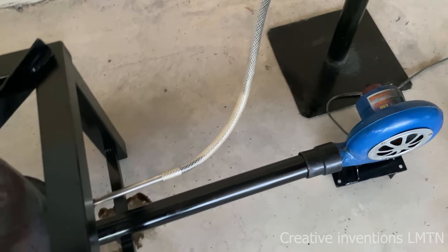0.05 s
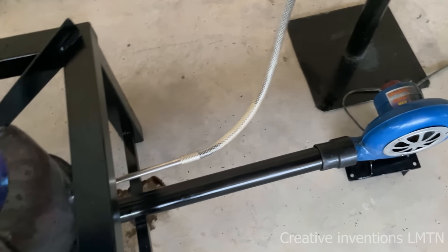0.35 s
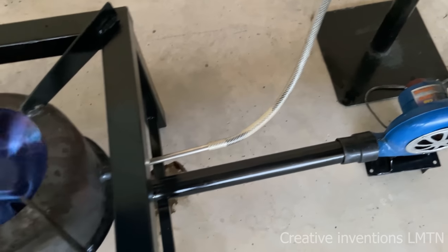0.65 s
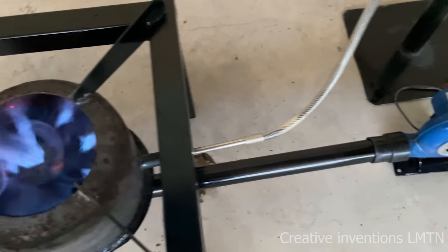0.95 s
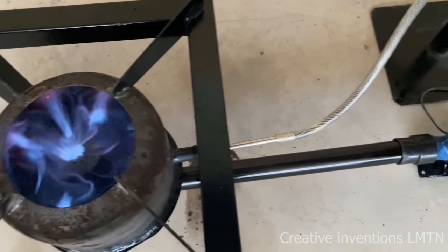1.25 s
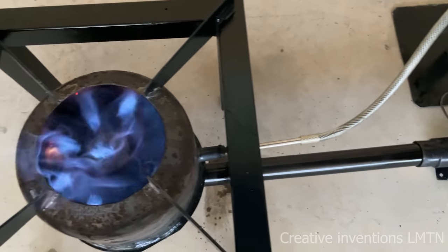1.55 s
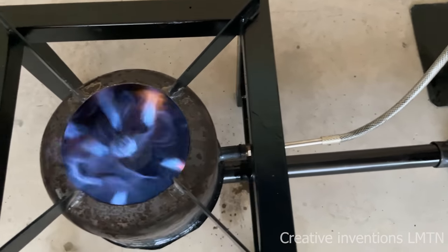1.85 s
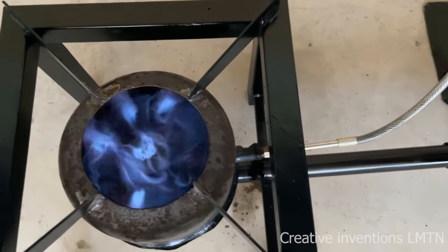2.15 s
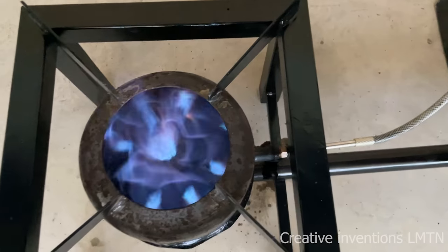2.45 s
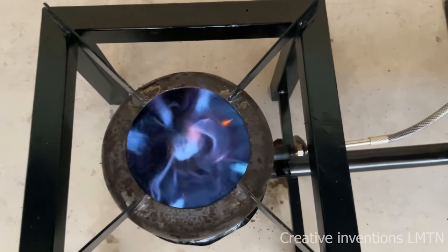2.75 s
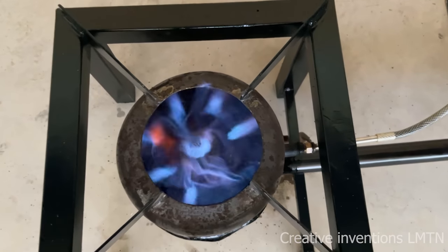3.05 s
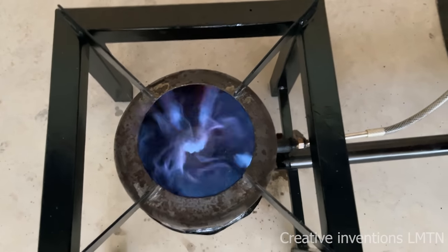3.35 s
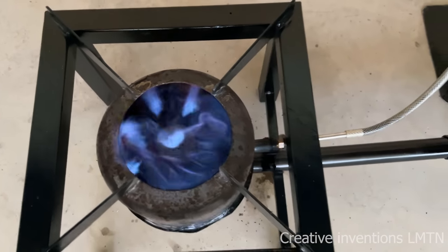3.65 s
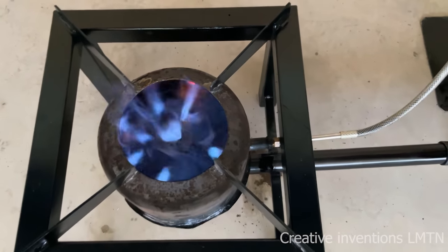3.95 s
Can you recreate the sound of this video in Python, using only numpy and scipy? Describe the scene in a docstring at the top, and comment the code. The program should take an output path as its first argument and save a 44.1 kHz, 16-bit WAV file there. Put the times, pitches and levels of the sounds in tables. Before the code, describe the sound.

A burner flame roars steadily over rushing air and a faint wavering whistle.

```python
"""A blower-fed oil burner runs in a bare workshop, heard from just above its fire pot.
From the start, the swirling flame roars and rumbles, air rushes from the pipe with a wavering whistle,
the fuel sizzles and the blower motor hums faintly. Over the first two seconds the roar grows and the
rush eases as the microphone drifts from the blower to the flame. Then both move from the left toward
the middle. Near the end the whistle swells again and the fuel gives two short spurts."""
import sys
import numpy as np
from scipy import signal
from scipy.fft import rfft, irfft
from scipy.io import wavfile
from scipy.ndimage import uniform_filter1d

SR = 44100
rng = np.random.default_rng(int(sys.argv[2]) if len(sys.argv) > 2 else 0)


def master_out(mix):
    """Clip the mix to full scale and print it as 16-bit PCM to the path in sys.argv[1]."""
    frames = np.transpose(np.atleast_2d(mix))
    ceiling = np.clip(frames, -1, 1)
    pcm = np.round(ceiling * 32767).astype(np.int16)
    wavfile.write(sys.argv[1], SR, pcm)


N = 176400
FLAME_LEAD_MS, AIR_LEAD_MS = 0.23, 0.048  # how much sooner these sounds arrive on the left


# how strongly the flame burns (t/s, level/dB)
FLAME_STRENGTH = [(0.0, -21.5), (0.05, -29), (0.2, -23.5), (0.43, -19.5), (0.5, -26.5), (0.58, -19),
                  (0.82, -24), (0.9, -19.5), (1.12, -21.5), (1.35, -17.5), (1.45, -20.5), (1.7, -18),
                  (1.95, -16.5), (2.0, -21), (2.1, -18), (2.25, -22), (2.45, -16.5), (2.68, -20.5),
                  (2.9, -18), (2.94, -21), (3.0, -17), (3.17, -18.5), (3.31, -24.5), (3.47, -19.5),
                  (3.8, -18.5), (4.0, -18.5)]
# tone the hollow pot gives the roar (f/Hz, level/dB)
POT_TONE = [(110, -34.5), (170, -14), (235, -11), (295, -5.5), (335, -2), (455, 1), (530, -9), (640, -17),
            (750, -20), (860, -29.5), (1020, -28), (1250, -45), (1450, -35), (1800, -37.5), (4000, -66.5)]
# the pot's upper ring, higher as the microphone comes over it (t/s, f/Hz, level/dB)
POT_RING = [(0, 670, -44.5), (0.9, 690.4, -40), (1.4, 718, -44), (1.9, 770, -46.5), (2.5, 805, -42.5),
            (3.02, 841.7, -41.5), (3.3, 828, -50.5), (4, 784, -45.5)]
# how much louder the left side is as the microphone moves (t/s, flame and whistle/dB, air/dB)
LEFT_BIAS = [(0, 8.5, 4), (.5, 6.5, 7), (1.1, 5.5, 9.5), (1.8, 4.5, 8), (2.5, 4, 4), (3.3, 2.5, 3.5),
             (4, 3, 4)]
def roar(flutter):
    """The swirling flame surges, flutters and flares, and the hollow pot rings with it."""
    db = curve(FLAME_STRENGTH) + flare_ups(column=1) + 0.6 + 0.96 * flutter
    burning = even(colour(noise(), POT_TONE)) * undb(db)
    phase = 2 * np.pi * np.cumsum(curve(POT_RING)) / SR
    ring = walk(150) * np.cos(phase) + walk(150) * np.sin(phase)  # a noise band about 150 Hz wide
    ring *= undb(curve(POT_RING, column=2))
    return hear(burning + ring, curve(LEFT_BIAS), FLAME_LEAD_MS, room_db=-8.5)


# tone of the burning gas (f/Hz, level/dB)
RUMBLE_TONE = [(20, -34), (32, -23), (45, -5), (68, 2), (112, 2), (140, -6), (175, -9), (260, -25.5),
               (500, -58)]
def rumble():
    """The churning, burning gas makes a deep rumble."""
    gas = even(colour(noise(), RUMBLE_TONE)) * undb(-29 + flare_ups(column=2))
    return hear(gas, pan_db=2.44, lead_ms=FLAME_LEAD_MS, room_db=-8.5)


# flare-ups in the pot (t/s, roar change/dB, rumble change/dB)
FLARE_UPS = [(0.138, 9, -8), (0.917, 2, 3), (0.945, 5.5, 0), (1.04, 7, -4.5), (1.675, 1, 9), (1.827, 6, 0),
             (2.046, 6.5, -6), (2.431, 6, -1), (2.493, 4.5, 3), (2.85, 2.5, 8), (3.12, 1, 6),
             (3.705, 2.5, 2), (3.99, 3, 3)]
def flare_ups(column, half_length_s=0.0071):
    """Each flare-up changes the flame's level for an instant; gives that change in dB."""
    t = np.arange(N) / SR
    rows = np.array(FLARE_UPS)
    bumps = np.exp(-.5 * ((t[:, None] - rows[:, 0]) / half_length_s) ** 2)
    return bumps @ rows[:, column]


# how strongly the air rushes (t/s, level/dB)
AIR_STRENGTH = [(0.0, -48), (0.41, -46), (0.51, -47.5), (0.56, -47), (0.82, -49.5), (0.92, -47),
                (1.04, -48.5), (1.17, -50.5), (1.29, -47.5), (1.53, -50), (1.61, -49.5), (2.1, -50.5),
                (2.17, -52.5), (2.45, -51.5), (2.85, -50.5), (2.92, -52), (3.05, -48.5), (3.13, -51),
                (3.65, -51.5), (3.98, -47.5)]
# tone of the air leaving the pipe (f/Hz, level/dB)
AIR_TONE = [(500, -22.5), (1000, 1.5), (1400, 3), (1780, -1.5), (2070, 0.5), (2450, -2), (2880, -1.5),
            (3250, -6.5), (3520, -3.5), (3900, -9), (5000, -12), (5700, -18), (9000, -43)]
def air_rush(flutter):
    """Blown air rushes out of the pipe into the pot."""
    rush = colour(noise(), AIR_TONE) * undb(curve(AIR_STRENGTH) + 3.5 + 0.87 * flutter)
    return hear(rush, curve(LEFT_BIAS, column=2), AIR_LEAD_MS, room_db=-3)


# pitch and strength of the whistle (t/s, f/Hz, level/dB)
JET_WHISTLE = [(0, 1581, -55), (0.3, 1587, -50), (0.55, 1569, -53), (0.66, 1580, -47), (0.9, 1585, -62),
               (1.04, 1600, -45), (1.13, 1605, -53), (1.25, 1574, -48), (1.44, 1576, -48.5),
               (1.85, 1590, -49.5), (2.27, 1570, -52), (2.41, 1618, -46.5), (2.6, 1628, -53.5),
               (2.75, 1597, -55), (2.89, 1645, -53), (3.3, 1576, -64), (3.52, 1568, -45.5),
               (3.75, 1590, -52), (3.92, 1590, -49), (4, 1586, -47)]
def whistle(jitter_hz=25, flicker_db=3.5, shakes_per_s=95):
    """The air jets whistle; the tone drifts, swells and fades, and swirling air roughens it."""
    hz = curve(JET_WHISTLE) + jitter_hz * walk(shakes_per_s)
    db = curve(JET_WHISTLE, column=2) - 0.5 + flicker_db * walk(shakes_per_s)
    tone = np.sqrt(2) * np.sin(2 * np.pi * np.cumsum(hz) / SR) * undb(db)
    return hear(tone, curve(LEFT_BIAS), AIR_LEAD_MS, room_db=-4.5)


# how strongly the fuel sizzles (t/s, level/dB)
SIZZLE_STRENGTH = [(0.0, -62), (0.2, -65), (0.39, -61.5), (0.48, -62), (0.57, -62), (0.83, -64.5),
                   (0.93, -60.5), (1.04, -62.5), (1.14, -64), (1.3, -60.5), (1.53, -64), (1.6, -63.5),
                   (1.97, -61), (2.0, -65), (2.04, -59), (2.11, -59.5), (2.15, -65.5), (2.27, -65.5),
                   (2.49, -62), (2.66, -65.5), (3.07, -63.5), (3.3, -66), (3.44, -64.5), (3.54, -66),
                   (3.8, -64.5), (3.835, -55.5), (3.9, -67), (3.97, -58)]
# tone of the sizzling fuel (f/Hz, level/dB)
SIZZLE_TONE = [(2500, -20), (4000, -8.5), (5000, 1.5), (5600, -9), (6700, 5.5), (8000, -6.5), (9400, 0),
               (11000, 1.5), (12500, -9), (14200, -9), (15500, -21)]
def sizzle(flutter):
    """Fuel hisses in the flame, with short spurts."""
    hiss = colour(noise(), SIZZLE_TONE) * undb(curve(SIZZLE_STRENGTH) + 10 + 1.2 * flutter)
    return hear(hiss, pan_db=0, lead_ms=-0.06, room_db=-8.5)


# tones of the blower's motor and fan (f/Hz, level/dB)
MOTOR_TONES = [(99.3, -39.5), (231, -38.5), (2137, -77), (2597, -85)]
def motor():
    """The spinning blower hums and whines faintly, at a nearly steady speed."""
    speed = 1 + 0.0022 * walk(4)
    phase_per_hz = 2 * np.pi * np.cumsum(speed) / SR
    return sum(np.sqrt(2) * undb(db + 2.3 * walk(2.7)) * np.sin(hz * phase_per_hz)
               for hz, db in MOTOR_TONES)


def hear(x, pan_db, lead_ms, room_db, fade_s=.25, bass_hz=300):
    """Sound arrives directly, lead_ms sooner on the left, and as a short echo from the bare walls."""
    sides = np.array([[1], [-1]])  # left, right
    x = x * signal.windows.tukey(N, .003)  # soft ends avoid clicks
    direct = irfft(rfft(x) * np.exp(1j * np.pi * bins() * sides * lead_ms / 1000), N)
    size = 1024  # samples in each slice of sound
    hz, _, slices = signal.stft(x, SR, nperseg=size)
    linger = undb(-60 * size / SR / fade_s)  # the echo falls 60 dB in fade_s
    power = signal.lfilter([1 - linger], [1, -linger], np.abs(slices) ** 2)
    scatter = np.exp(2j * np.pi * rng.random((2,) + slices.shape))
    bass_cut = (hz ** 2 / (hz ** 2 + bass_hz ** 2))[:, None]
    echo = signal.istft(np.sqrt(2 * power) * bass_cut * scatter)[1][:, :N]
    mix = (direct + undb(room_db) * echo) / np.hypot(1, undb(room_db))
    return mix * undb(sides * pan_db / 2)


def even(x, span_s=.09):
    """Even out the slow chance swells of a noise: the fuel feed is steady."""
    return unit(x / np.sqrt(uniform_filter1d(x ** 2, int(span_s * SR))))


def colour(x, points):
    """Shape a sound's lows and highs by (f/Hz, level/dB) points, at a strength of 1."""
    hz, db = np.array(points).T
    gain = undb(np.interp(np.log(bins() + 1), np.log(hz), db))
    return unit(irfft(rfft(x) * gain, N))


def walk(rate):
    """A smooth random wobble of size 1 that turns about `rate` times a second."""
    return unit(irfft(rfft(noise()) * (bins() > 0) / (1 + (bins() / (rate / 2)) ** 4), N))


def curve(table, column=1):
    """One column of a time table, joined by straight lines."""
    rows = np.array(table)
    return np.interp(np.arange(N) / SR, rows[:, 0], rows[:, column])


def noise():
    """White noise: a plain hiss."""
    return rng.standard_normal(N)


def bins():
    """The frequencies that make up a full-length sound, in Hz."""
    return np.arange(N // 2 + 1) * SR / N


def undb(db):
    """Turn decibels into a multiplier."""
    return 10 ** (np.asarray(db) / 20)


def unit(x):
    """Scale to an average strength (rms) of 1."""
    return x / np.sqrt(np.mean(x ** 2))


def scene():
    """Everything sounds at once; the same swirling shakes the roar, the air and the sizzle."""
    flutter = walk(24)
    return roar(flutter) + rumble() + air_rush(flutter) + whistle() + sizzle(flutter) + motor()


def record(dry, top_hz=15000):
    """Cut away the very highest treble."""
    return signal.sosfilt(signal.ellip(8, .2, 70, top_hz, fs=SR, output="sos"), dry)


dry = scene()
out = record(dry)
master_out(out)
```